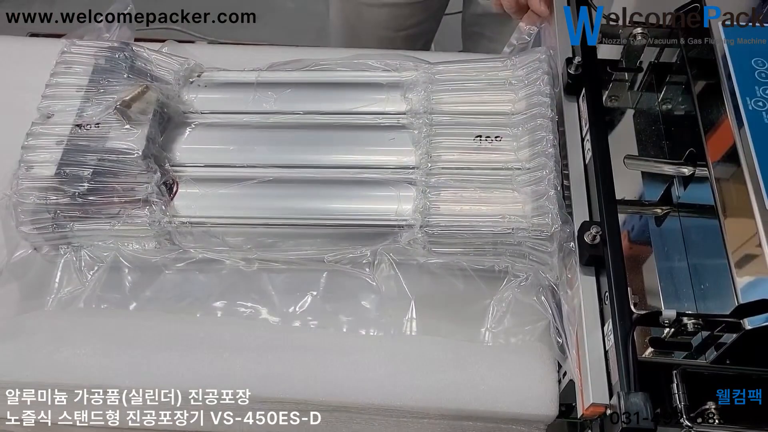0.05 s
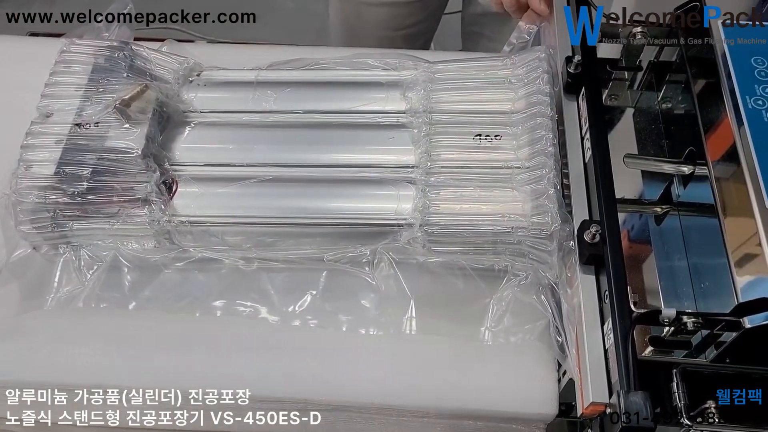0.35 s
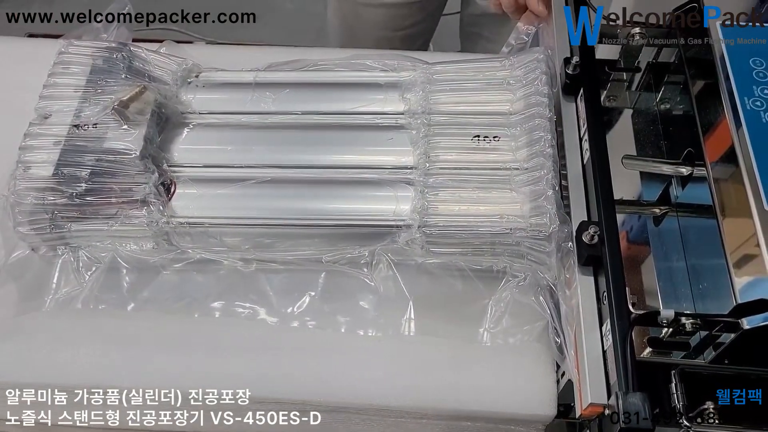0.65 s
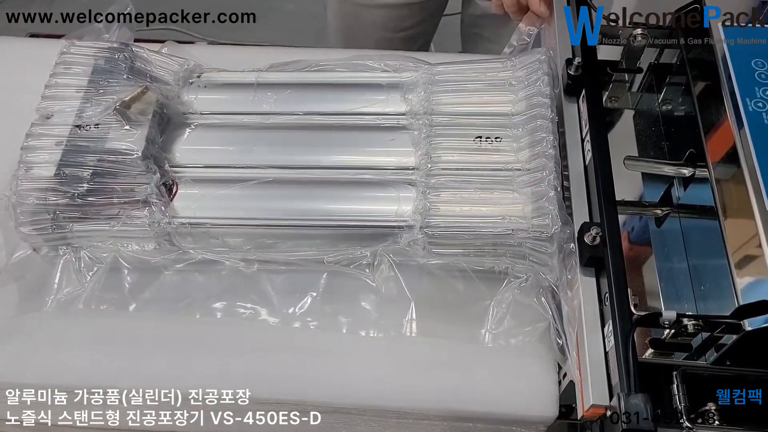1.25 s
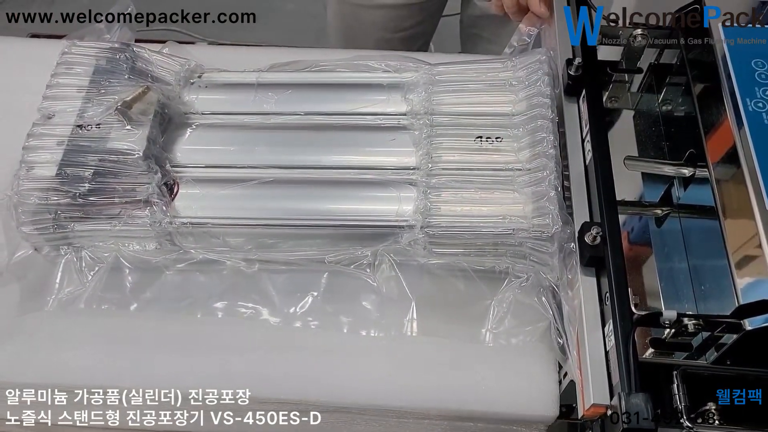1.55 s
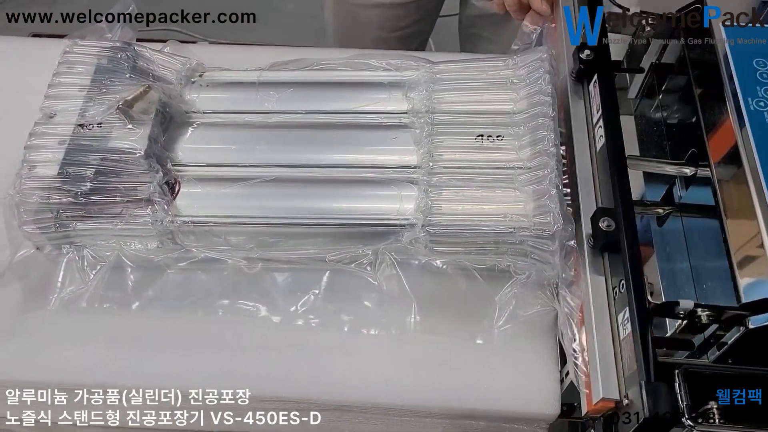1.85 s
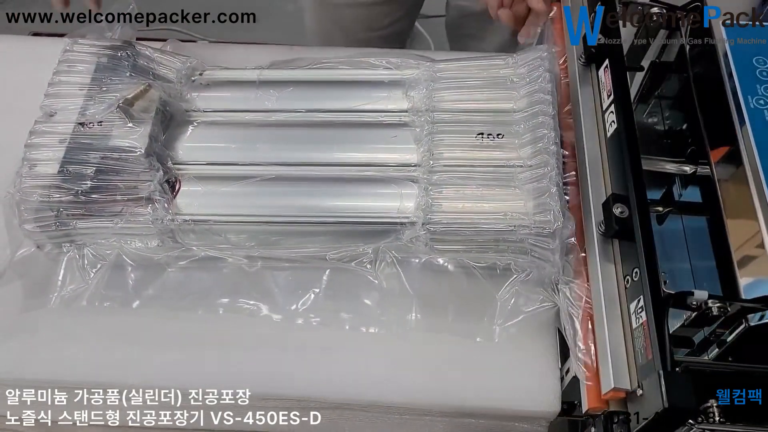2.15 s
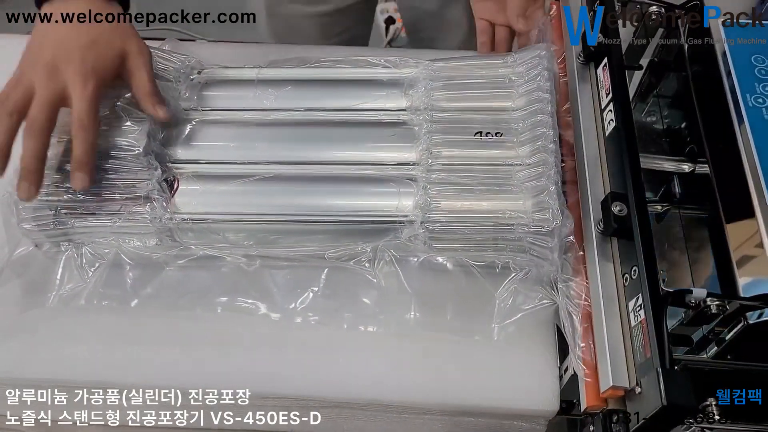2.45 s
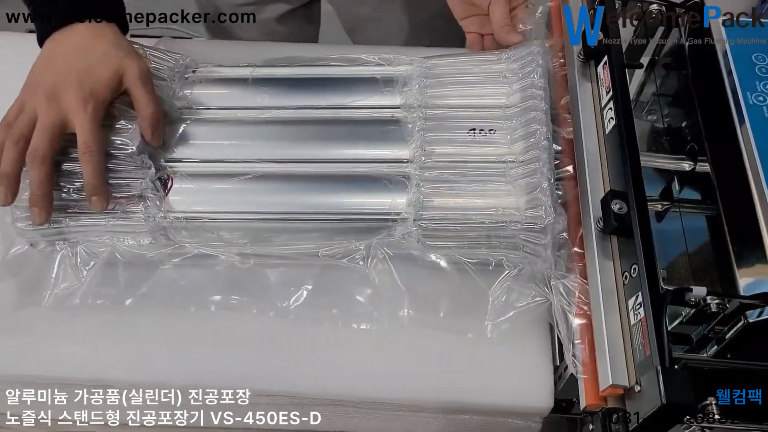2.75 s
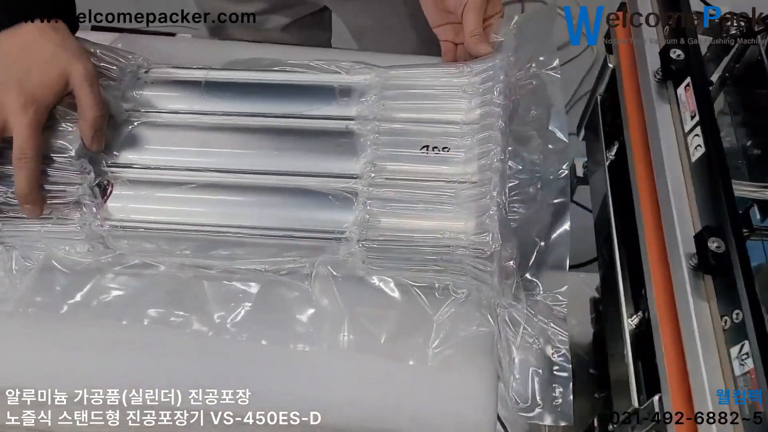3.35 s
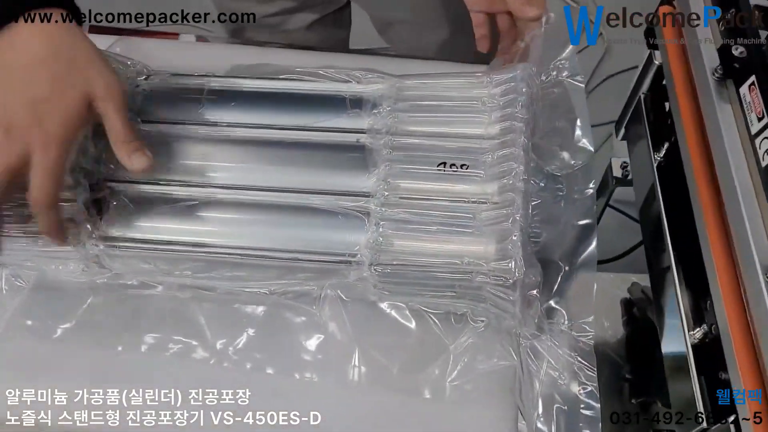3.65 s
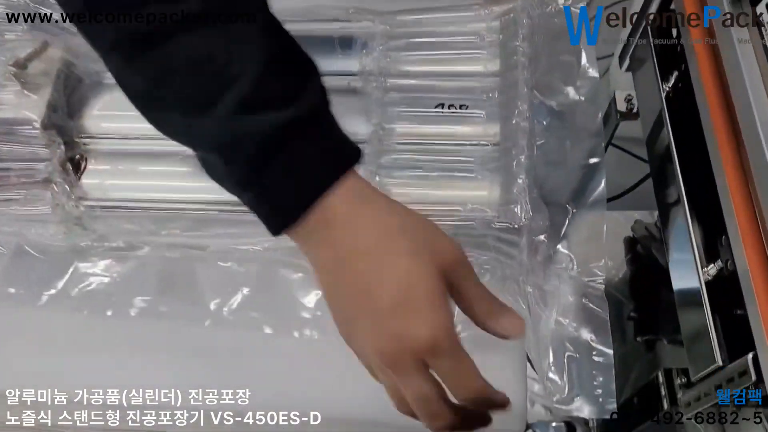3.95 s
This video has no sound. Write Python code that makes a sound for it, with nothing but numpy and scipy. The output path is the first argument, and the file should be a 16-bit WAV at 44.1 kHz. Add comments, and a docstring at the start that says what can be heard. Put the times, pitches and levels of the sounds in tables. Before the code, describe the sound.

A vacuum packing machine sucks air with a steady hiss over a low pump hum. A valve thumps, the sealing bar clacks and squeals open, and a plastic bag rustles faintly, heard close in a small workshop.

```python
"""Vacuum packer in a workshop

A stereo microphone stands close to the machine in a small room with a short tail. Air hisses through the nozzle
over a humming pump, then a valve thumps and lets air back in. The sealing bar unlatches with sharp clacks, each
led in by a brief burst, then squeals and ticks as it slides open. The plastic bag rustles and scuffs over the
table as it is pulled away."""
import sys
import numpy as np
from scipy import signal
from scipy.fft import rfft, irfft
from scipy.io import wavfile
from scipy.ndimage import uniform_filter1d, map_coordinates

SR = 44100
rng = np.random.default_rng(int(sys.argv[2]) if len(sys.argv) > 2 else 0)


def wrap_up_sound(samples):
    """Save the sound to the file named by the first command line argument, as 16-bit audio."""
    columns = np.atleast_2d(samples).T
    # keep every value between -1 and 1, then stretch to whole-number steps
    tamed = np.clip(columns, -1, 1)
    steps = np.round(tamed * 32767).astype(np.int16)
    wavfile.write(sys.argv[1], SR, steps)


N = 176400

# stereo width at the microphone: frequency_hz, side_minus_mid_db
STEREO_WIDTH = [(60, -8), (120, -15), (200, -12), (380, -2), (700, 0.5), (1290, 5.5), (2380, -1.5),
                (4400, 2), (8120, -7), (15000, -2)]
# workshop room tone: frequency_hz, density_db
ROOM_TONE_SPECTRUM = [(12, -35), (20, -4), (64, 2.5), (137, -7.5), (166, -14.5), (382, -15), (686, -18.5),
                      (1500, -14), (2150, -20), (2610, -21), (4950, -41), (6190, -25.5), (9930, -55),
                      (12400, -73), (15500, -36)]
# its course: time_s, level_db
ROOM_TONE_LEVEL = [(0, -35.5), (1.6, -30.5), (2.1, -40.5), (2.9, -40), (3.25, -39.5), (3.45, -34.5),
                   (4, -38.5)]
# electrical hum: pitch_hz, level_db
MAINS_PARTIALS = [(60, -46.5), (120, -52)]
# pump hum: time_s, level_db
PUMP_HUM_LEVEL = [(0, -33.5), (.4, -34), (1.0, -30.5), (1.39, -33), (1.6, -26.5), (1.68, -51), (2.1, -63)]

# crinkling plastic: frequency_hz, density_db
CRINKLE_SPECTRUM = [(150, -30), (350, 4.5), (600, -7), (1200, 5.5), (2500, -2.5), (4500, -12.5), (7000, -4),
                    (14000, -29)]
# its course: time_s, level_db
CRINKLE_LEVEL = [(1.7, -65), (1.765, -25), (1.80, -35), (1.84, -31), (1.9, -43.5), (2.1, -70), (2.7, -43.5),
                 (3.2, -60), (3.4, -48), (3.62, -48), (3.8, -49), (4, -41.5)]
# bag scuffing the table: time_s, level_db
BAG_SCUFF_LEVEL = [(2.85, -75), (3.08, -49), (3.28, -58), (3.41, -44.5), (3.52, -53), (4, -52)]
# soft, heavy blows of valve and bag: start_s, attack_s, level_db, pitch_hz, t60_s
SOFT_BLOWS = [(1.417, 0.0093, -18.5, 83.4, 0.2), (1.462, 0.005, -15, 89, 0.16),
              (1.642, 0.00073, -19.5, 236, 0.2), (1.6512, 0.003, -2, 190, 0.033),
              (1.657, 0.0017, -23, 205, 0.46), (3.042, 0.0073, -29.5, 113, .12),
              (3.416, .007, -24.5, 72, .09), (3.605, .008, -28, 59.5, 0.073)]

# air let back in after the valve: frequency_hz, density_db
VENT_SPECTRUM = [(60, -5), (130, 1.5), (240, 6.5), (300, -14), (380, -11), (800, -6), (1400, -12),
                 (2500, -12), (4400, -15), (6000, -33)]
# its course: time_s, level_db
VENT_AIR_LEVEL = [(1.6, -55), (1.66, -24.5), (1.72, -37), (1.77, -32), (1.84, -34.5), (1.92, -34.5),
                  (2.0, -38.5), (2.15, -39.5), (2.6, -72)]
# valve knocks: start_s, level_db
VALVE_KNOCKS = [(1.651, -16.5), (1.659, -18)]
# their dull thud: frequency_hz, density_db
THUD_SPECTRUM = [(250, -3), (750, 1), (1000, -3), (1350, 1), (1900, -13), (8000, -20), (15000, -28)]
# ring of the valve housing: pitch_hz, level_db, t60_s
HOUSING_MODES = [(531, -19, .09), (747, -12, .11), (860, -14, .1), (1250, -12, .06), (2865, -18, .14),
                 (4384, -21, .4)]

# rumble of the moving bar: time_s, level_db
RUMBLE_LEVEL = [(2.0, -55), (2.18, -42), (2.48, -48.5), (2.58, -60), (2.75, -50), (2.9, -62), (3.12, -38.5),
                (3.22, -56.5), (3.42, -39), (3.6, -59)]
# latch and slide catching: start_s, level_db, pitch_hz
CATCHES = [(1.8878, -15, 1400), (1.9148, -17, 1900), (2.596, -30.5, 1010), (2.622, -26, 1040),
           (2.643, -25.5, 1160), (2.663, -28, 1200), (2.7062, -10.5, 1274), (2.7095, -16, 2060),
           (2.748, -18, 855), (2.7548, -19, 810), (3.6322, -24.5, 2700)]
# bar unlatching: start_s, knock_db, burst_db, burst_length_s, left_minus_right_db
BAR_CLACKS = [(1.8793, -18, -12.5, 0.0033, -4), (1.887, -17, -27, .003, -2), (1.901, -25, -26, .003, 13),
              (1.914, -16, -28, .003, -7), (1.979, -27.5, -31, .003, -3), (2.005, -18.5, -13, 0.0078, 0),
              (2.009, -12.5, -34, 0.0037, -8), (2.026, -21, -32, .004, 1), (2.753, -29, -60, .002, 0)]
# knock of the frame: frequency_hz, density_db
FRAME_SPECTRUM = [(100, -20), (220, -9), (370, 4), (650, 1), (900, 0), (1250, 5), (1700, -5.5),
                  (2500, -0.5), (4000, -23), (8000, -6), (15000, -78)]
# brief burst before each clack: frequency_hz, density_db
BURST_SPECTRUM = [(500, -2), (1500, 2), (2600, 6.5), (4000, -2.5), (7500, 1), (11000, -1), (15000, -3)]
# ring of the bar: pitch_hz, level_db, t60_s
SEALING_BAR_MODES = [(194.5, -20, 0.35), (396.5, -8.5, .12), (748, -9, 0.072), (880, -8.5, 0.17),
                     (1196, -7, 0.031), (2090, -12, .13), (2720, -11, 0.091), (5470, -27, .12)]

# squeal of the slide: time_s, pitch_hz
SLIDE_PITCH = [(2.17, 2100), (2.36, 2093), (2.57, 2088), (2.61, 2130), (2.64, 2172), (2.67, 2160),
               (2.74, 2170), (2.8, 2172), (2.95, 2155), (3.25, 2151)]
# its fundamental: time_s, level_db, left_minus_right_db
SLIDE_LEVEL = [(2.15, -53, 3), (2.195, -24.5, -5), (2.232, -32.5, -2), (2.25, -22, 0), (2.31, -25, 0),
               (2.335, -17, -5.5), (2.365, -17, -10), (2.39, -22.5, -6), (2.415, -29, -10),
               (2.46, -21.5, 8), (2.5, -20.5, -21), (2.52, -27.5, 2), (2.59, -30.5, -12), (2.64, -25.5, -5),
               (2.69, -27, -7), (2.785, -30, -4), (2.815, -24.5, -11), (2.84, -33.5, 10),
               (2.93, -32.5, -12), (3.02, -33.5, 15), (3.07, -41, 3.5), (3.3, -55, -2)]
# its overtones: time_s, level_db
OVERTONE_LEVEL = [(2.2, -58), (2.3, -47), (2.39, -37), (2.45, -41), (2.47, -48), (2.6, -52), (2.64, -32),
                  (2.67, -38), (2.87, -48), (3.3, -78)]
# its judder: time_s, depth_0_to_1
JUDDER_DEPTH = [(2.2, .3), (2.35, .15), (2.6, .7), (2.76, .7), (2.81, .3), (3.1, .5)]
# moments when the slide sticks: time_s
STICK_TIMES = [2.208, 2.265, 2.41, 2.483, 2.517, 2.55, 2.588, 2.722, 2.791, 2.845, 2.868, 2.98, 3.055]

# air rushing through the nozzle: frequency_hz, density_db
SUCTION_SPECTRUM = [(88, -30), (150, -15.5), (213, 1), (263, -26), (420, -8), (500, -17), (751, -5),
                    (894, -14), (1340, 0.5), (2360, -1), (3980, 0.5), (5650, -1), (9000, -7.5),
                    (12500, -14), (15500, -26)]
# its course: time_s, level_db
SUCTION_LEVEL = [(0, -26), (.3, -25), (.7, -25), (1.05, -24), (1.3, -26), (1.6, -25), (1.84, -27.5),
                 (1.94, -29), (2.05, -36.5), (2.12, -38), (2.35, -38), (2.6, -42), (2.85, -44.5)]
# nozzle whistles at peak flow: pitch_hz, width_hz, level_db
WHISTLES = [(2003, 36, -42), (2372, 40, -39.5), (2860, 110, -38.5), (3130, 71, -44), (6227, 130, -40),
            (6770, 75, -42.5)]
# thin whine of the nozzle: time_s, level_db
NOZZLE_WHINE_LEVEL = [(0, -58), (.2, -47), (1.15, -44), (1.6, -53), (2.05, -68), (2.35, -56), (2.6, -76),
                      (2.9, -84), (4, -80)]
# broad resonance that swells at full flow: time_s, level_db
FLOW_SWELL_LEVEL = [(0, -43.5), (.35, -34), (.85, -29), (1.3, -45), (2.1, -70)]
# top treble of the hiss: time_s, level_db
HISS_TREBLE_LEVEL = [(0, -41), (.6, -36), (1.3, -41), (1.62, -39), (1.86, -37), (1.95, -64), (2.12, -65),
                     (2.3, -48), (2.5, -66), (2.9, -77)]
# lower nozzle resonance that swells as the bag tightens: time_s, level_db
NOZZLE_THROAT_LEVEL = [(.6, -50), (.92, -43), (1.07, -33), (1.17, -43), (1.42, -40), (2.1, -62)]

ATTACK_S = .0016  # rise of a hard knock
TIME = np.arange(N) / SR
FREQ_HZ = np.fft.rfftfreq(N, 1 / SR) + 1


def undb(db):
    """Decibels to gain."""
    return 10 ** (np.asarray(db) / 20)


def unit(x):
    """Scale to rms 1."""
    return x / np.sqrt(np.mean(x ** 2))


def curve(rows, column=1):
    """One column of a table, joined by straight lines in time."""
    rows = np.array(rows)
    return np.interp(TIME, rows[:, 0], rows[:, column])


def gains(spectrum):
    """Gain at every frequency from rows of frequency_hz, level_db."""
    hz, db = np.array(spectrum).T
    return undb(np.interp(np.log(FREQ_HZ), np.log(hz), db))


def resonance(hz, width_hz):
    """Response of one resonance."""
    return 1 / (1 + 1j * (FREQ_HZ ** 2 - hz ** 2) / (FREQ_HZ * width_hz))


def stereo(response, source=None):
    """Colour two unrelated signals (noise by default) and spread them as mid and side."""
    mid, side = rfft(rng.standard_normal((2, N)) if source is None else source) * response
    width = gains(STEREO_WIDTH)
    left_right = np.array([mid + width * side, mid - width * side]) / np.sqrt(1 + width ** 2)
    return unit(irfft(left_right, N))


def band(hz, width_hz):
    """Stereo noise passed twice through one resonance."""
    return stereo(resonance(hz, width_hz) ** 2)


def walk(rate_hz):
    """Smooth random motion with a spread near 1."""
    hold = int(SR / rate_hz)
    steps = np.repeat(rng.standard_normal(N // hold + 1), hold)
    return 1.3 * uniform_filter1d(uniform_filter1d(steps, hold), hold)[:N]


def stereo_walk(rate_hz):
    """Separate random motion for left and right."""
    return np.array([walk(rate_hz), walk(rate_hz)])


def phase_of(hz):
    """Running phase of a changing pitch."""
    return 2 * np.pi * np.cumsum(hz) / SR


def envelope(start_s, attack_s, decay_s, hold_s=0):
    """Linear rise, hold, exponential fall."""
    age = TIME - start_s
    return np.clip(age / attack_s, 0, 1) * np.exp(-np.clip((age - attack_s - hold_s) / decay_s, 0, 100))


def pan(db):
    """Left and right gains for a level difference."""
    sides = undb(np.array([db, -db]).reshape(2, -1) / 2)
    return sides / np.sqrt(np.mean(sides ** 2, axis=0))


def shimmer(x, depth_db=2.7, patch_s=.07, patch_hz=130):
    """Turbulence lifts and dips narrow parts of the spectrum for moments."""
    hz, times, spectra = signal.stft(x, SR, nperseg=1024)
    patches = rng.standard_normal((int(hz[-1] / patch_hz) + 2, int(times[-1] / patch_s) + 2))
    grid = np.meshgrid(hz / patch_hz, times / patch_s, indexing="ij")
    db = depth_db * map_coordinates(patches, grid, mode="mirror")
    return unit(signal.istft(spectra * undb(db), SR)[1][:, :N])


def ringing(modes):
    """A struck part rings in decaying modes, with a different phase left and right."""
    return sum(undb(db - 60 * TIME / t60) * np.sin(2 * np.pi * (hz * TIME + .5 * rng.random((2, 1))))
               for hz, db, t60 in modes)


def room(x, t60_s=.36, tail_db=-15):
    """The workshop's diffuse tail reaches the microphone just after the direct sound."""
    t = np.arange(SR // 2) / SR
    dull_noise = signal.lfilter([1], [1, -.5], rng.standard_normal((2, len(t))))
    tail = dull_noise * undb(-60 * t / t60_s) * (t > .004)
    tail /= np.sqrt(np.sum(tail ** 2, axis=1, keepdims=True))
    return x + undb(tail_db) * signal.fftconvolve(x, tail, axes=1)[:, :N]


def room_tone():
    """Low, restless workshop air all around the microphone."""
    return shimmer(stereo(gains(ROOM_TONE_SPECTRUM))) * undb(curve(ROOM_TONE_LEVEL) + walk(10))


def mains():
    """The machine's steady electrical hum, dead centre."""
    return sum(undb(db) * unit(np.sin(2 * np.pi * (hz * TIME + rng.random())))
               for hz, db in MAINS_PARTIALS)


def pump(pitch_hz=65.65, octave_db=-17.5, waver_db=1.5):
    """The pump's wavering low hum falls away when the valve knocks."""
    phase = phase_of(pitch_hz * (1 + .015 * walk(12)))
    hum = unit(np.sin(phase) + undb(octave_db) * np.sin(2 * phase))
    return hum * undb(curve(PUMP_HUM_LEVEL) - waver_db * walk(17.56))


def bag_scuff():
    """The bag rubs unevenly over the table."""
    return band(hz=351, width_hz=180) * undb(curve(BAG_SCUFF_LEVEL) + 2 * walk(29.97))


def bag_crinkle(crinkles_per_s=1500, spread_db=2.5):
    """Plastic film crinkles in dense clicks as the bag settles and as it is pulled away."""
    clicks = (rng.random((2, N)) < crinkles_per_s / SR) * rng.standard_normal((2, N))
    accents = undb(spread_db * np.minimum(rng.exponential(size=(2, N)), 2))
    return stereo(gains(CRINKLE_SPECTRUM), clicks * accents) * undb(curve(CRINKLE_LEVEL))


def thumps():
    """Soft blows of the valve and the bag, each a damped low swing."""
    return sum(undb(db) * envelope(start, attack, t60 / np.log(1000))
               * np.sin(2 * np.pi * hz * (TIME - start)) for start, attack, db, hz, t60 in SOFT_BLOWS)


def vent():
    """Air flutters back in after the valve."""
    return shimmer(stereo(gains(VENT_SPECTRUM))) * undb(curve(VENT_AIR_LEVEL) + 2.6 * walk(50.45))


def valve():
    """Right of centre, the valve knocks twice with a dull thud and its housing rings on."""
    thud, out = stereo(gains(THUD_SPECTRUM)), 0
    for start, db in VALVE_KNOCKS:
        ring = np.pad(ringing(HOUSING_MODES), ((0, 0), (int(start * SR), 0)))[:, :N]
        out += undb(db) * (thud * envelope(start, ATTACK_S, decay_s=.0056) + ring)
    return pan(db=-6) * out


def bar_rumble():
    """The bar rumbles low while it moves."""
    return band(hz=147, width_hz=20) * undb(curve(RUMBLE_LEVEL))


def bar_squeak(start_s=2.05, pitch_hz=5070, bend_hz=80, level_db=-33):
    """A brief thin squeak as the bar comes free; its pitch flicks up and settles."""
    hz = pitch_hz + bend_hz * envelope(start_s, ATTACK_S, decay_s=.0038)
    shape = envelope(start_s, attack_s=.002, decay_s=.002, hold_s=.033)
    return undb(level_db) * unit(np.sin(phase_of(hz))) * shape


def ticks(crack_db=-20, rattle_db=-10.5):
    """Latch and slide catch: each tick is a few damped swings, a bright crack and a short rattle."""
    crack = undb(crack_db) * stereo(gains(BURST_SPECTRUM) * resonance(hz=2800, width_hz=6000))
    out = 0
    for start, db, hz in CATCHES:
        swing = np.sin(2 * np.pi * hz * (TIME - start))
        snap = (swing + crack) * envelope(start, attack_s=.00074, decay_s=.0018)
        rattle = undb(rattle_db) * band(hz, width_hz=hz) * envelope(start, ATTACK_S, decay_s=.0065)
        out += undb(db) * (snap + rattle)
    return pan(db=-2.5) * out


def bar_clacks(burst_rise_s=.0028, burst_decay_s=.0018, ring_db=-8):
    """Each clack has a brief noise burst that rises into the blow, knocks the frame and rings the bar."""
    frame, noise = stereo(gains(FRAME_SPECTRUM)), stereo(gains(BURST_SPECTRUM))
    blows, out = np.zeros((2, N)), 0
    for start, knock_db, burst_db, burst_length, side_db in BAR_CLACKS:
        before = (start - TIME) / burst_rise_s
        after = (TIME - start - burst_length / 2) / burst_decay_s
        burst = undb(burst_db) * noise * np.exp(-np.clip(np.maximum(before, after), 0, 100))
        knock = undb(knock_db) * frame * envelope(start, ATTACK_S, decay_s=.007)
        out += pan(side_db) * (knock + burst)
        blows[:, int(start * SR)] += undb(knock_db) * pan(side_db)[:, 0]
    ring = signal.fftconvolve(blows, ringing(SEALING_BAR_MODES), axes=1)[:, :N]
    return out + undb(ring_db) * ring


def slide_squeal(stick_s=.0045, waver_db=1.4, skirt_db=-15, third_db=-15, flutter_hz=45):
    """The slide squeals and judders across the stereo image, dropping out whenever it sticks."""
    phase = phase_of(curve(SLIDE_PITCH) * (1 + .005 * walk(90)))
    sliding = np.prod([1 - np.exp(-((TIME - at) / stick_s) ** 2) for at in STICK_TIMES], axis=0)
    depth, grip = curve(JUDDER_DEPTH), walk(105)
    judder = 1 - depth * np.exp(-(grip / .55) ** 2)  # a dip whenever the grip passes through zero
    level = undb(curve(SLIDE_LEVEL) + waver_db * stereo_walk(110))
    tone = np.sqrt(2) * np.sin(phase + depth * stereo_walk(70))
    skirt = undb(skirt_db) * band(hz=2120, width_hz=170)  # roughness around the pitch
    fundamental = (tone + skirt) * judder * level * pan(curve(SLIDE_LEVEL, column=2))
    flutter = 1 + .42 * np.sin(phase_of(flutter_hz * (1 + .3 * walk(40))))
    scatter_rad = .6 * stereo_walk(80)
    octave = np.sin(2 * phase + scatter_rad)
    third = undb(third_db) * np.sin(3 * phase + scatter_rad)
    overtones = np.sqrt(2) * (octave + third) * flutter * undb(curve(OVERTONE_LEVEL))
    return sliding * (fundamental + overtones)


def suction():
    """Close to the microphone, air rushes through the nozzle and rings resonances that come and go."""
    flow = undb(curve(SUCTION_LEVEL))
    noise = shimmer(stereo(gains(SUCTION_SPECTRUM))) * undb(1.2 * walk(25.36))
    whistles = sum(undb(db + 2 * walk(7.34)) * band(hz, width) for hz, width, db in WHISTLES)
    whine = undb(curve(NOZZLE_WHINE_LEVEL) + 5.5 * walk(20)) * band(hz=12312, width_hz=70)
    swell = undb(curve(FLOW_SWELL_LEVEL)) * shimmer(band(hz=5740, width_hz=1050))
    treble = undb(curve(HISS_TREBLE_LEVEL) + .83 * walk(19.8)) * shimmer(band(hz=12800, width_hz=6000))
    throat = undb(curve(NOZZLE_THROAT_LEVEL)) * shimmer(band(hz=2600, width_hz=700))
    return noise * flow + whistles * flow / flow.max() + whine + swell + throat + treble


def scene():
    """The workshop from beside the machine; only the hard knocks and the bag's rustle get the tail."""
    bed = room_tone() + vent() + bar_rumble()
    with_tail = room(bag_scuff() + valve() + bar_clacks() + ticks() + bag_crinkle())
    direct = mains() + suction() + pump() + thumps() + bar_squeak() + slide_squeal()
    return bed + with_tail + direct


def record(dry, top_hz=15300):
    """The recorder behind the microphone cuts the top steeply."""
    return signal.sosfilt(signal.ellip(10, .2, 80, top_hz, fs=SR, output="sos"), dry)


dry = scene()
out = record(dry)
wrap_up_sound(out)
```